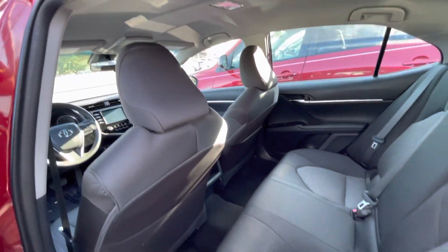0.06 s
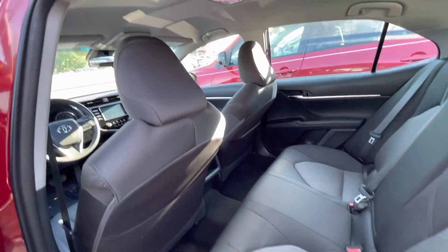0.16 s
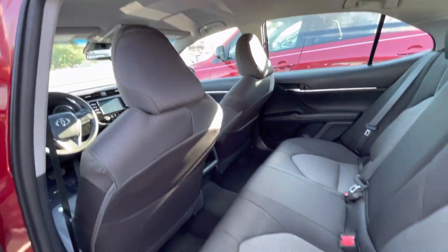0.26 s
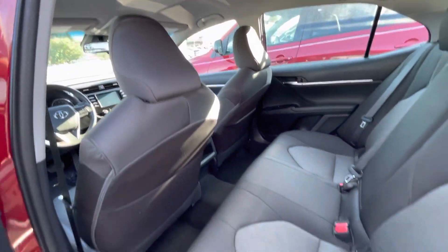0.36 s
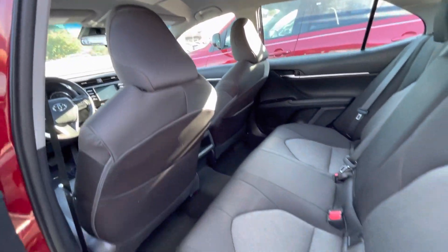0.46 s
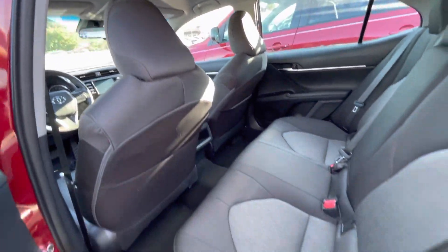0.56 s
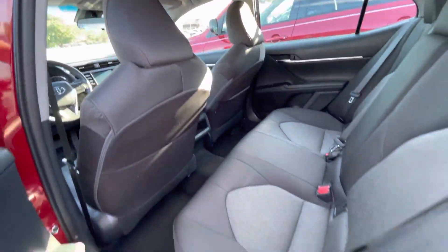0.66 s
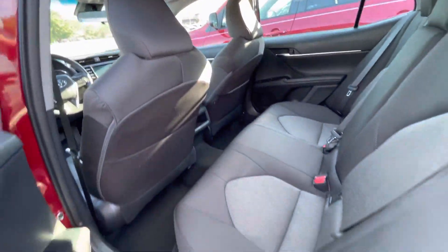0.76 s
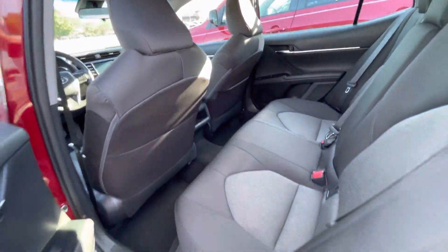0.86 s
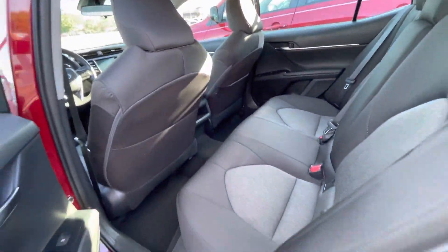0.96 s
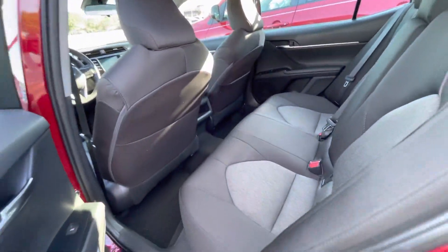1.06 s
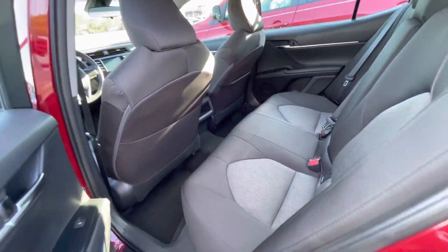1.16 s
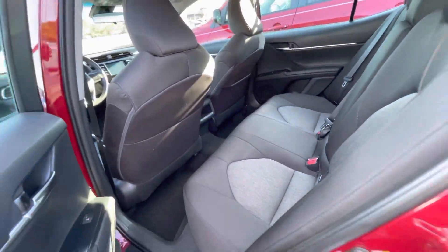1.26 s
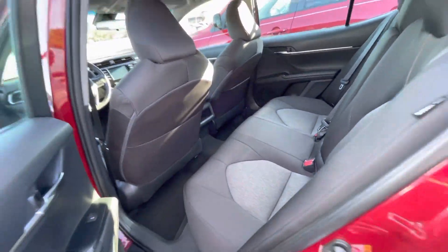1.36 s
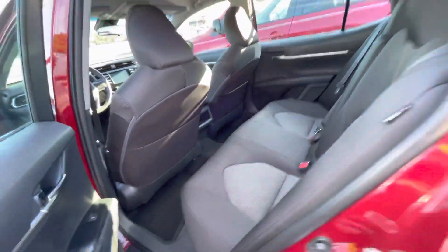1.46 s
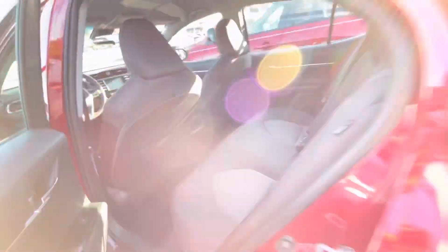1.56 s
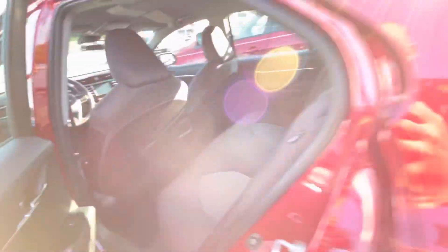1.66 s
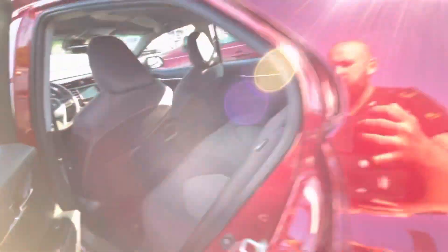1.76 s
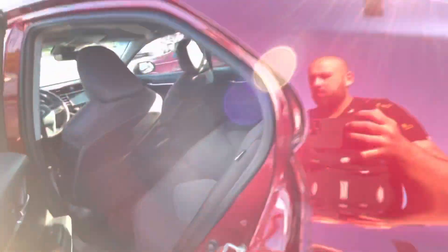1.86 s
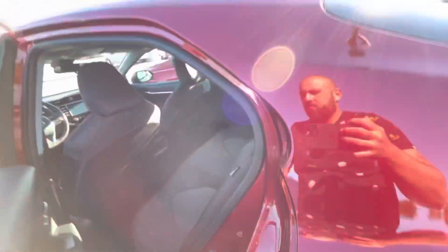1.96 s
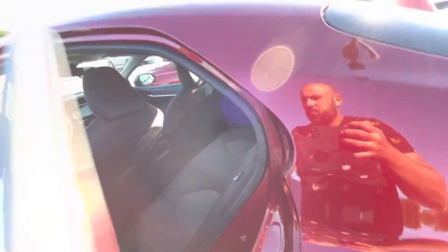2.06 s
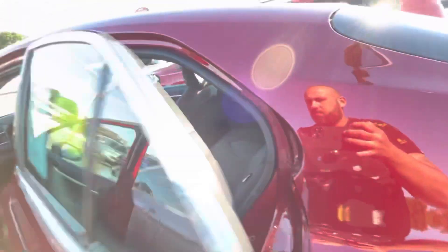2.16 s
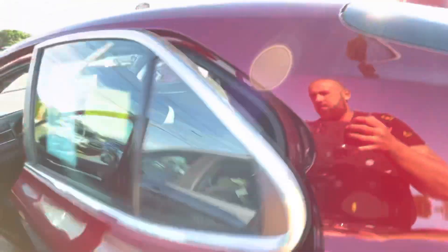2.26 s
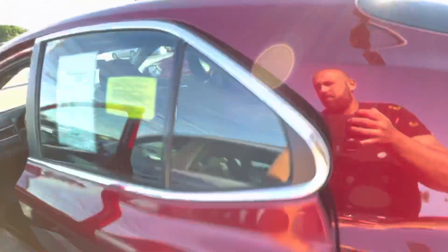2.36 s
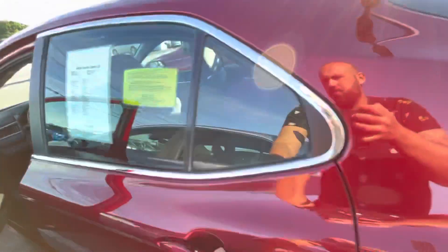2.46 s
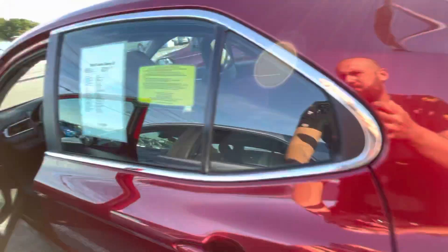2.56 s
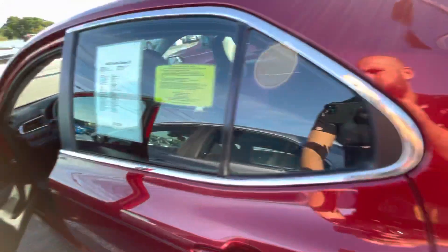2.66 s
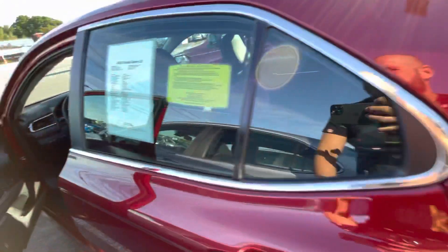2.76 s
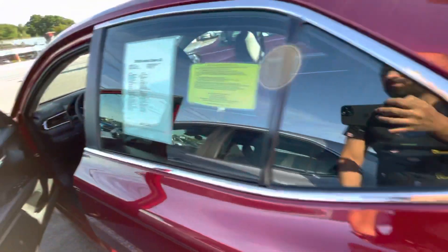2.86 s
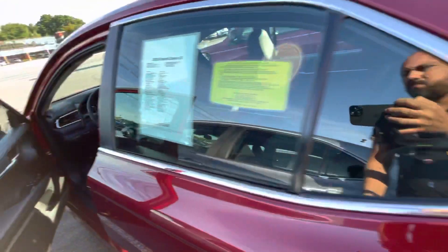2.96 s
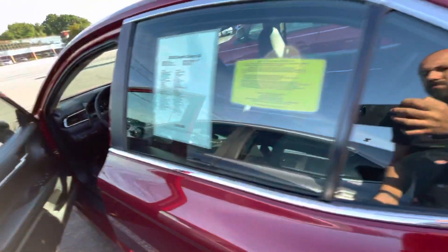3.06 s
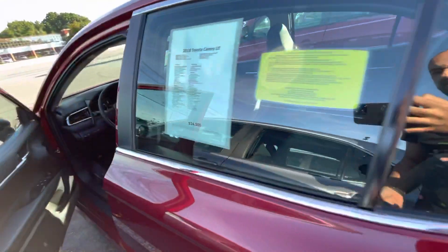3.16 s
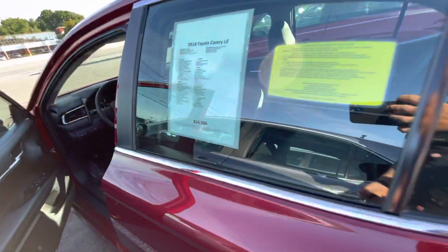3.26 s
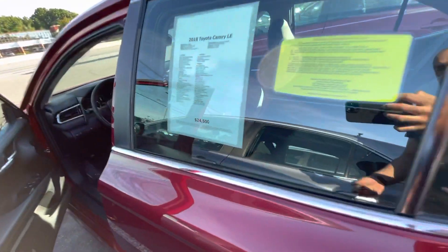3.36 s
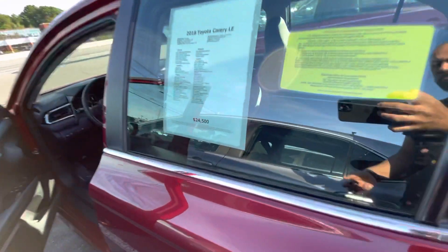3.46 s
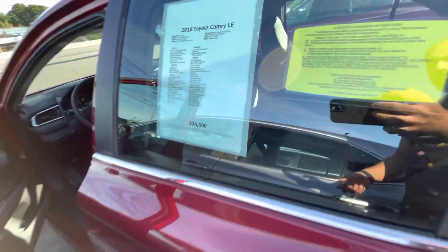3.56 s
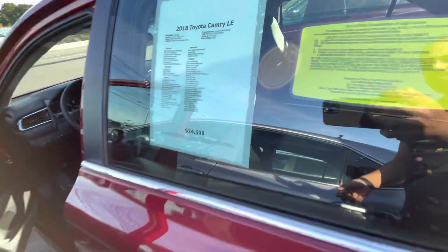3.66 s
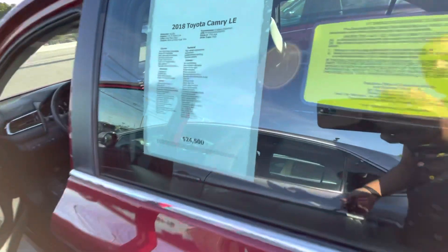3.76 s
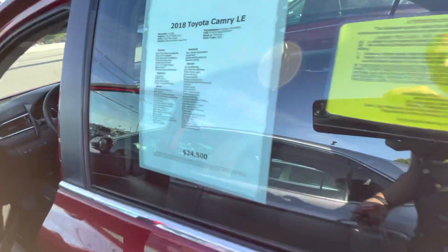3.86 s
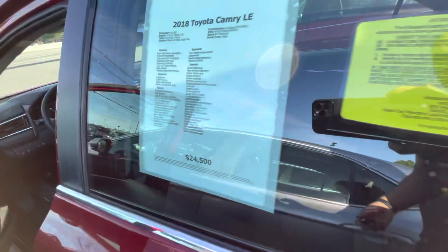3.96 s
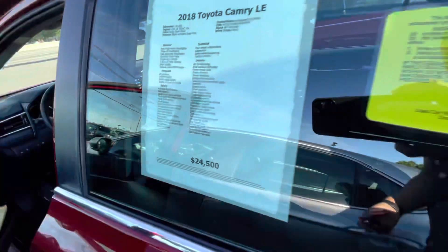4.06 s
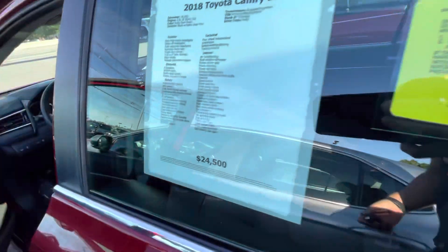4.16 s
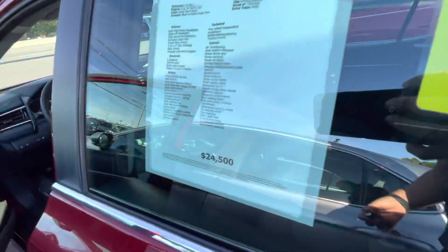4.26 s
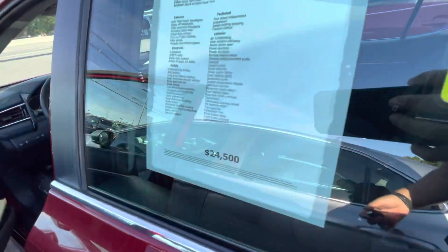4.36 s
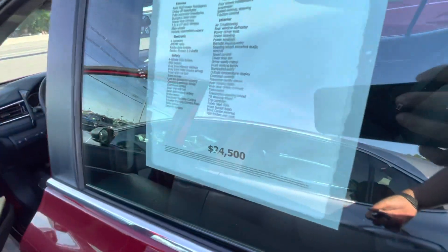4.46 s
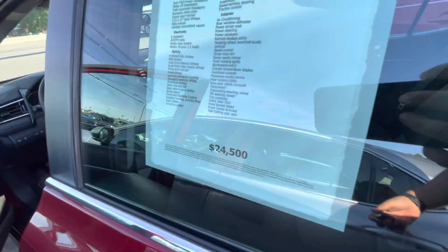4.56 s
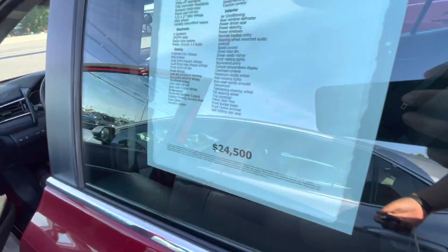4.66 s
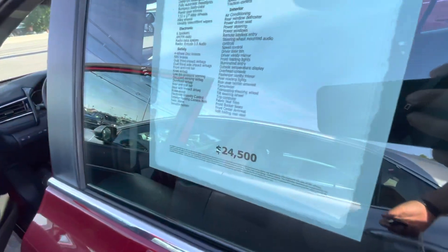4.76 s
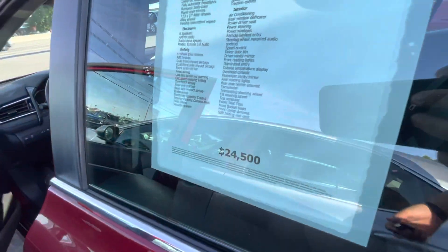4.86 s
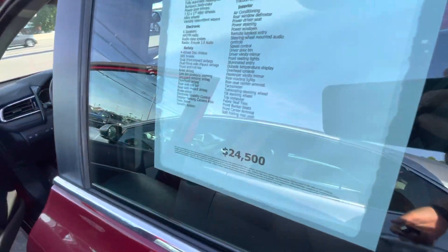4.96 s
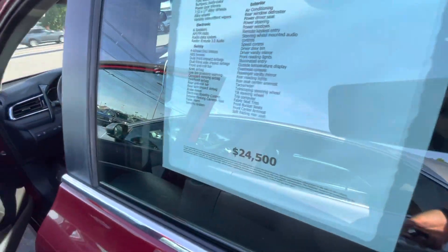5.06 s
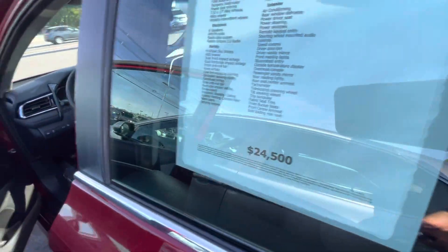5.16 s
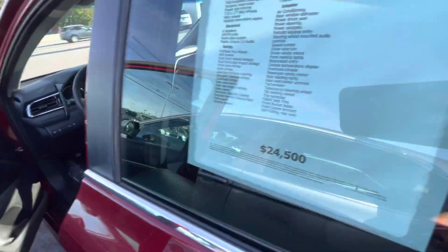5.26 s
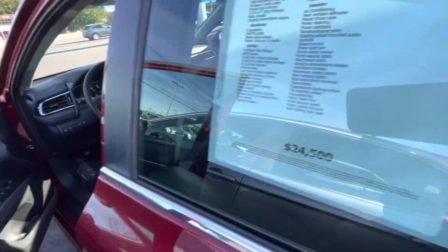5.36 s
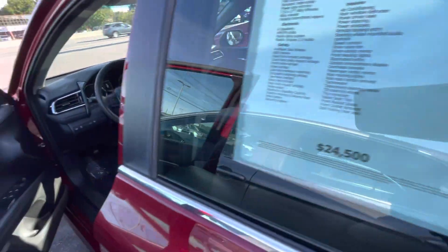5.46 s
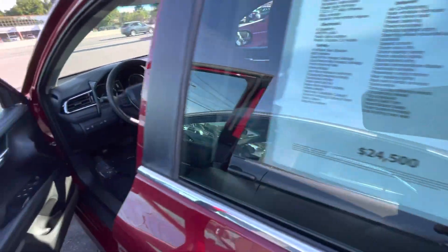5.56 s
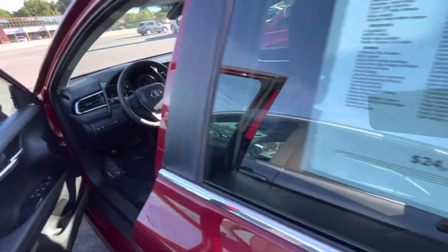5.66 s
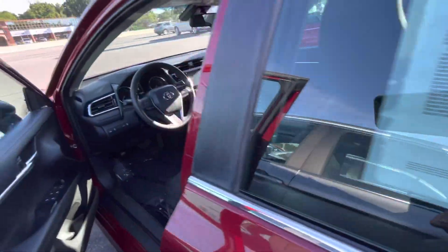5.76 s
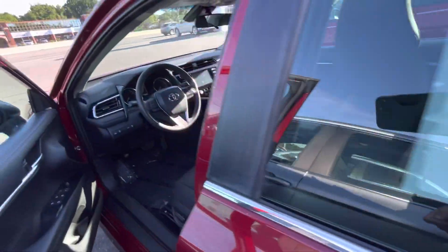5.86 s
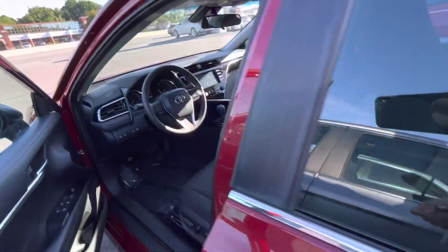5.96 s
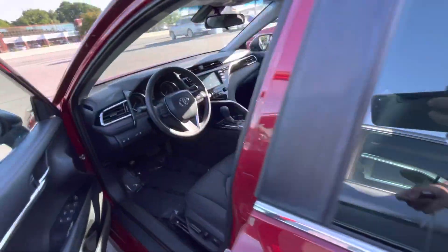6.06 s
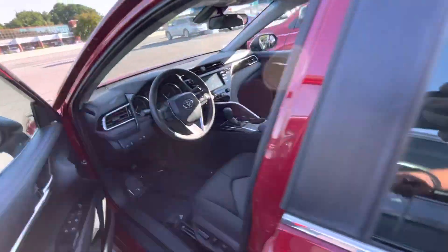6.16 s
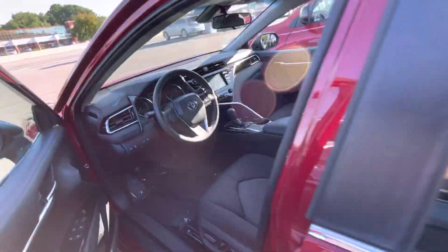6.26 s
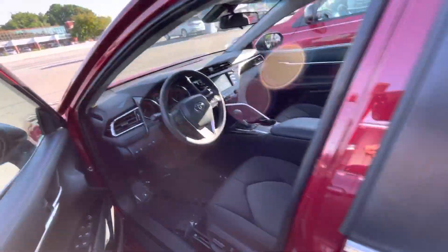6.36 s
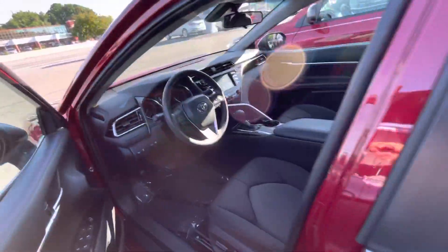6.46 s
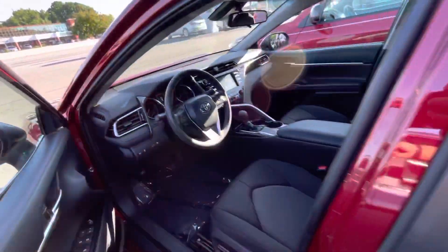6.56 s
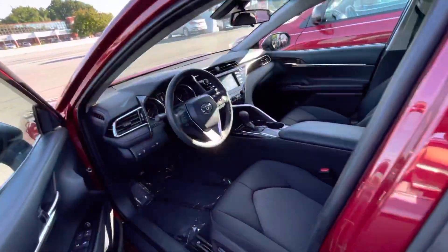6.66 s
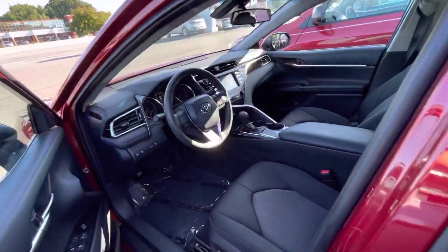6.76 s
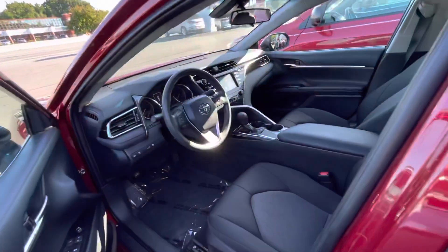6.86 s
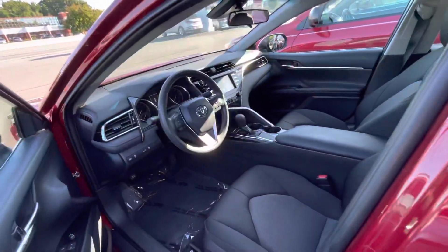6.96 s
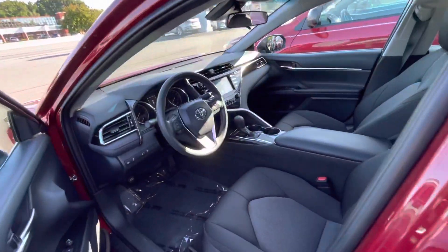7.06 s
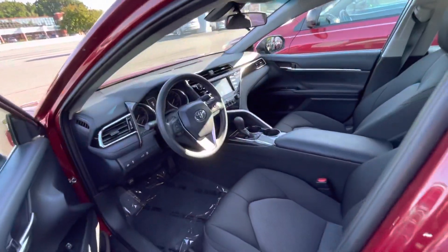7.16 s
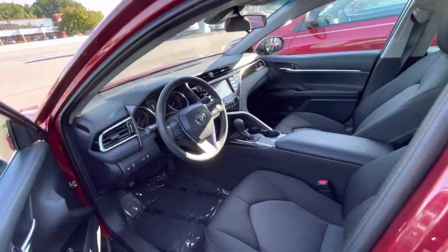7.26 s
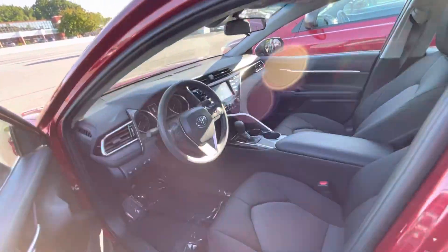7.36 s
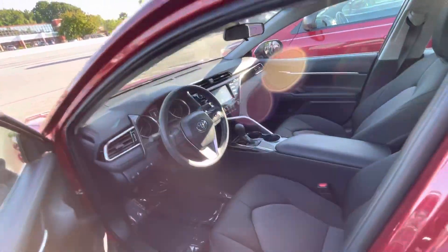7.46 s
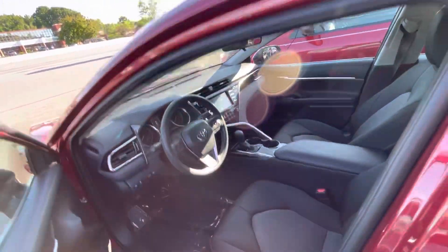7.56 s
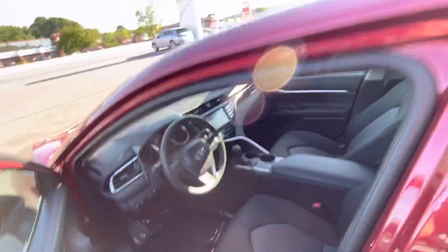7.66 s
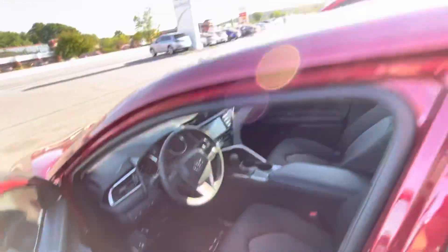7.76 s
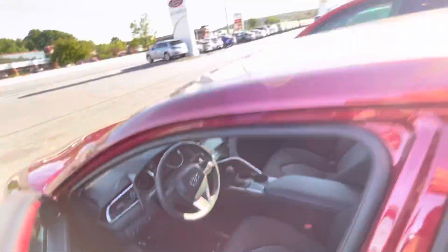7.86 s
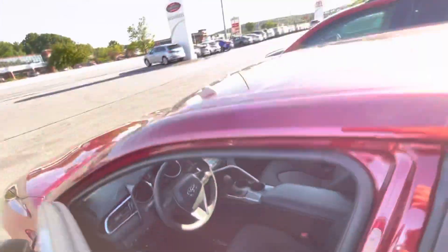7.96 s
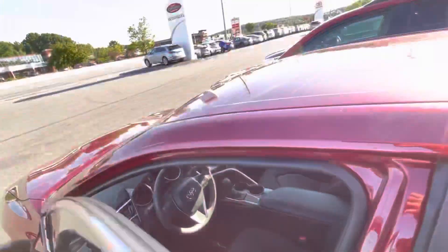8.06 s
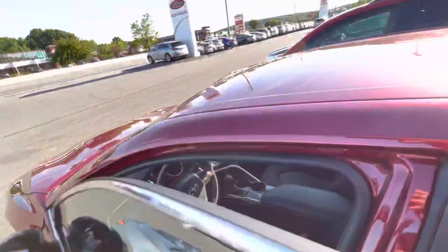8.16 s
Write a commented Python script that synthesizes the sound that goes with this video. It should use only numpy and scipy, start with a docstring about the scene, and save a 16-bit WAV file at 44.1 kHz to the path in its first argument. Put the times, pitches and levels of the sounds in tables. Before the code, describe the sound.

On an open lot with low traffic rumble, a car door slams with a heavy boom, then a dry clatter and a hard ringing clack follow.

```python
"""Car door closing on an open lot

A latch catches, a panel slams and a cabin booms: damped modes, filtered impact noise and low swells.
A dry clatter and later a ringing clack are runs of struck modes with grit; a limiter ducks loud peaks.
Scuffs, ticks, thuds and rustles are shaped noise; traffic and one passing car are coloured noise.
Small birds call faintly as gliding sines, with one buzzing trill of narrow-band noise."""
import sys
import numpy as np
from scipy import signal
from scipy.io import wavfile
from scipy.ndimage import uniform_filter1d, minimum_filter1d

SR = 44100
rng = np.random.default_rng(int(sys.argv[2]) if len(sys.argv) > 2 else 0)


def store_wav(level_fs):
    """Save 16-bit WAV to argv[1]."""
    pcm = np.round(np.clip(np.atleast_2d(level_fs), -1, 1) * 32767)
    wavfile.write(sys.argv[1], SR, pcm.T.astype(np.int16))


N = 362061
TIME = np.arange(N) / SR
RING_TIME = TIME[:SR // 2]


def amp(db):
    """Level law: decibels to amplitude gain."""
    return 10 ** (np.asarray(db) / 20)


def unit(x):
    """Normalization: scales a signal to rms 1."""
    return x / np.sqrt(np.mean(x ** 2) + 1e-20)


def read(points, hz):
    """Spectral envelope: joins (frequency, level) points on a log-frequency axis."""
    point_hz, level_db = np.transpose(points)
    return np.interp(np.log(hz + 1), np.log(point_hz + 1), level_db)


def over_time(points):
    """Linear interpolation of (time, value) points over the whole scene."""
    return np.interp(TIME, *np.transpose(points))


def panned(db):
    """Interaural level difference: left and right gains, positive to the left."""
    return amp(np.array([[db], [-db]]) / 2)


def add(mix, s, sound):
    """Superposition: mixes a stereo sound in at time s."""
    part = mix[:, round(s * SR):][:, :sound.shape[1]]
    part += sound[:, :part.shape[1]]


def dying(t60):
    """Exponential decay: falls 60 dB in t60 seconds."""
    return np.exp(-np.log(1000) * RING_TIME / t60)


def burst(t60, rise_s):
    """Impact envelope: a quick rise times an exponential decay."""
    return dying(t60) * (1 - np.exp(-RING_TIME / rise_s))


def grit(envelope, colour, tilt_db=0, same=.4, grain_db=-5.5):
    """Source-filter principle: tiny impacts of uneven size, coloured by the body they strike."""
    size = len(envelope)
    common, left, right = rng.standard_normal((3, size))
    same = np.clip(same, 0, 1)  # share of power common to both channels
    spray = np.sqrt(same) * common + np.sqrt(1 - same) * np.array([left, right])
    grain_size = amp(grain_db * np.minimum(rng.exponential(1, size), 4))
    spray = unit(spray * grain_size) * envelope

    hz = abs(np.fft.fftfreq(2048, 1 / SR))
    tilt = tilt_db * np.log2((hz + 100) / 2000)
    gain = unit(amp(read(colour, hz) + tilt))
    # minimum phase: the body rings only after each impact
    spectrum = np.exp(np.conj(signal.hilbert(np.log(gain))))
    body = np.fft.ifft(spectrum).real
    return signal.fftconvolve(spray, body[None, :1024], axes=1)[:, :size]


def ring(modes, lag_s, rise_s):
    """Modal superposition: decaying sines; the left port hears them lag_s after the right."""
    t = np.maximum(RING_TIME - np.array([[lag_s], [0]]), 0)
    total = 0
    for hz, db, t60, pan in modes:
        total = total + amp(db) * panned(pan) * dying(t60) * np.sin(2 * np.pi * hz * t)
    return (1 - np.exp(-t / rise_s)) * total


def wash(colour_db, same, lead_s, patchy_db, streaky_db=0):
    """Filtered noise, left port first; its level wavers in random short patches and longer narrow streaks."""
    frames, hz = N // 512 + 5, np.fft.rfftfreq(2048, 1 / SR)[:, None]
    a, b, c, d, patches, streaks = rng.standard_normal((frames, len(hz), 6)).T
    # axis 0 is frequency, axis 1 is time
    patches = uniform_filter1d(patches, size=14, axis=0)
    patches = unit(uniform_filter1d(patches, size=7, axis=1))
    streaks = uniform_filter1d(streaks, size=4, axis=0)
    streaks = unit(uniform_filter1d(streaks, size=45, axis=1))

    same = np.clip(same, -1, 1)  # correlation of the channels before the delay
    left = a + 1j * b
    right = same * left + np.sqrt(1 - same ** 2) * (c + 1j * d)
    right = right * np.exp(-2j * np.pi * hz * lead_s)
    frame_s = np.arange(frames) * 512 / SR
    level_db = colour_db(hz, frame_s) + patchy_db * patches + streaky_db * streaks
    spectra = np.array([left, right]) * amp(level_db)
    return unit(signal.istft(spectra, nperseg=2048, noverlap=1536)[1][:, :N])


def echoes(x, t60):
    """Diffuse reflection: scattered echoes from the parked cars around."""
    colour = [(100, 5.5), (800, -3.0), (3000, -10), (12000, -11.5)]  # frequency_hz, relative_level_db
    scatter = grit(burst(t60, rise_s=.01), colour, same=0.23)
    return signal.fftconvolve(x, scatter / np.linalg.norm(scatter[0]), axes=1)[:, :N]


# spectrum of the far road [frequency_hz, relative_level_db]
FAR_ROAR_COLOUR = [(150, -18), (300, -0.5), (500, -5.5), (700, -1.5), (950, 1), (1250, -4.5), (1800, -13),
                   (3000, -36.5), (6000, -71)]
# one hollow band that drifts in the far roar [time_s, centre_hz, lift_db]
HOLLOW_BAND = [(0, 865, 6), (.8, 820, 10.5), (1.3, 715, 12), (1.55, 840, 14), (1.85, 765, -3.5),
               (2.2, 780, 9), (2.9, 664, 8.5), (3.55, 664, 11.5), (3.9, 694, 6.5), (4.3, 904, 14),
               (4.8, 950, -2.5), (5.8, 940, 7.5), (6.5, 950, -1.5)]
HOLLOW_WIDTH_HZ = 100


def far_roar(hz, t):
    """Spectral envelope of the far road, with a Gaussian band that drifts."""
    s, centre_hz, lift_db = np.transpose(HOLLOW_BAND)
    offset = (hz - np.interp(t, s, centre_hz)) / HOLLOW_WIDTH_HZ
    return read(FAR_ROAR_COLOUR, hz) + np.interp(t, s, lift_db) * np.exp(-offset ** 2)


# level of the engine rumble all around [time_s, level_db]
ENGINE_LEVEL = [(0, -42), (.6, -40), (1.8, -42), (4.1, -41), (5.5, -42.5), (6.3, -47), (8.21, -45)]
# spectrum of the engine rumble [frequency_hz, relative_level_db]
RUMBLE_COLOUR = [(15, -31.5), (30, -26), (45, -7.5), (60, 5), (75, 0), (95, 1.5), (125, -4.5), (165, -10),
                 (215, -8.5), (290, -21.5), (400, -31), (800, -60.5)]
# spectrum of the far tyre hiss [frequency_hz, relative_level_db]
TYRE_COLOUR = [(600, -9), (1100, 1), (1600, 3), (2300, -5.5), (3200, -14), (4500, -19), (7000, -30),
               (12000, -68)]
FAR_ROAR_DB, FAR_HISS_DB = -50.5, -60


def traffic():
    """Incoherent summation: far engines rumble under a roar and tyre hiss."""
    rumble = wash(lambda hz, t: read(RUMBLE_COLOUR, hz),
                  same=0.99, lead_s=0.00061, patchy_db=1.28, streaky_db=0.77)
    roar = wash(far_roar, same=0.32, lead_s=0.00029, patchy_db=0.3, streaky_db=2.0)
    hiss = wash(lambda hz, t: read(TYRE_COLOUR, hz),
                same=0.69, lead_s=0.00028, patchy_db=2.0, streaky_db=3.5)
    road = amp(FAR_ROAR_DB) * roar + amp(FAR_HISS_DB) * hiss
    return amp(over_time(ENGINE_LEVEL)) * rumble + panned(2.1) * road


CLOSEST_S, SPEED_M_PER_S, DISTANCE_M = 4.965, 15, 10.3


def nearness(t):
    """Inverse-distance law: the car's closest distance over its distance at time t."""
    return DISTANCE_M / np.hypot(DISTANCE_M, SPEED_M_PER_S * (t - CLOSEST_S))


# one reflection cuts notches; its delay is longest when the car is closest
NOTCH_FAR_S, NOTCH_NEAR_S, NOTCH_DEPTH_DB = 0.00252, .00291, 2.5
NOTCH_BOTTOM_HZ, NOTCH_TOP_HZ = 750, 2300
# as the car leaves, a second reflection sets in and lags more and more, so its bands sink
SWEEP_START_S, SWEEP_ONSET_S, SWEEP_DELAY_S, SWEEP_S_PER_S = 4.67, .2, 0.0012, .00103
SWEEP_LIFT_DB, SWEEP_DEPTH_DB, SWEEP_TOP_HZ = 2, 5, 1050


def reflections(hz, t):
    """Comb filtering: two reflections off parked cars ripple the car's spectrum, in dB."""
    notch_s = NOTCH_FAR_S + (NOTCH_NEAR_S - NOTCH_FAR_S) * nearness(t) ** 2
    notches_db = -NOTCH_DEPTH_DB * np.cos(2 * np.pi * hz * notch_s)
    notches_db = notches_db * np.tanh((hz / NOTCH_BOTTOM_HZ) ** 2) ** 2
    notches_db = notches_db / (1 + (hz / NOTCH_TOP_HZ) ** 2)

    leaving_s = np.maximum(t - SWEEP_START_S, 0)
    delay_s = SWEEP_DELAY_S + SWEEP_S_PER_S * leaving_s
    sweep_db = SWEEP_LIFT_DB + SWEEP_DEPTH_DB * np.cos(2 * np.pi * hz * delay_s)
    sweep_db = sweep_db * np.tanh(leaving_s / SWEEP_ONSET_S) / (1 + (hz / SWEEP_TOP_HZ) ** 2)
    return sweep_db + notches_db


# parked cars screen the car except through one gap: change of the roar [time_s, gain_db]
SCREEN_GAIN = [(2.9, -4), (3.7, -1), (4.25, -3), (4.5, 1), (5.2, -0.5), (5.8, -1.5), (6.4, -8)]
HISS_SCREENING, FIZZ_SCREENING = 1.3, 1.8  # higher bands change this many times as much in dB
# spectra of the car's three bands of noise [frequency_hz, relative_level_db]
CAR_ROAR_COLOUR = [(150, -17), (300, -9), (450, -2), (650, 1), (950, 1), (1250, -7), (1800, -12.5),
                   (3000, -35), (6000, -62.5)]
CAR_HISS_COLOUR = [(600, -14), (1100, -2.5), (1600, 3.5), (2300, -4.5), (3200, -11), (4500, -21),
                   (7000, -32.5), (12000, -57.5)]
CAR_FIZZ_COLOUR = [(1500, -20), (3500, 5), (5200, 1), (6500, 1), (8500, -5), (10500, -19.5), (12500, -25),
                   (13500, -40)]
# levels at the closest point, before screening
CAR_ROAR_DB, CAR_HISS_DB, CAR_FIZZ_DB = -39.5, -47.5, -62.5


def passing_car():
    """Distance law and screening: a car at steady speed, its treble opening in the gap."""
    screen_db = over_time(SCREEN_GAIN)
    roar = wash(lambda hz, t: read(CAR_ROAR_COLOUR, hz) + reflections(hz, t),
                same=0.64, lead_s=0.00039, patchy_db=1.55, streaky_db=3.33)
    hiss = wash(lambda hz, t: read(CAR_HISS_COLOUR, hz) + reflections(hz, t),
                same=0.33, lead_s=0.00037, patchy_db=1.1, streaky_db=3.2)
    fizz = wash(lambda hz, t: read(CAR_FIZZ_COLOUR, hz),
                same=0.23, lead_s=0.00012, patchy_db=4.8, streaky_db=-0.5)
    car = amp(CAR_ROAR_DB + screen_db) * roar
    car = car + amp(CAR_HISS_DB + HISS_SCREENING * screen_db) * hiss
    car = car + amp(CAR_FIZZ_DB + FIZZ_SCREENING * screen_db) * fizz
    return nearness(TIME) * panned(1.2) * car


# clothes rustle with each movement [start_s, length_s, level_db]
RUSTLE_EVENTS = [(1.0, 0.85, -81), (1.932, 0.63, -67), (2.5, 1.03, -74.5), (3.687, 0.2, -71),
                 (5.82, 0.37, -64), (6.374, 0.19, -67.5), (7.353, 0.2, -78.5), (7.862, 0.42, -74.5)]
# spectrum of the rustle [frequency_hz, relative_level_db]
RUSTLE_COLOUR = [(1500, -22), (3500, 6), (6000, -0.5), (9000, 3), (10500, -17), (12000, -19.5),
                 (13000, -35.5)]
RUSTLE_EDGE_S, AIR_DB = 0.03, -82


def clothes():
    """Friction noise under smooth gates: rustles swell, hold and fade over a faint hiss."""
    level = amp(AIR_DB)
    for s, length, db in RUSTLE_EVENTS:
        swell = np.tanh((TIME - s) / RUSTLE_EDGE_S)
        fade = np.tanh((TIME - s - length) / RUSTLE_EDGE_S)
        level = level + amp(db) * (swell - fade) / 2
    noise = wash(lambda hz, t: read(RUSTLE_COLOUR, hz),
                 same=0.22, lead_s=.0003, patchy_db=3.5, streaky_db=3.0)
    return level * panned(0.69) * noise


# shoe scuffs on gritty asphalt [peak_s, level_db, rise_s, fall_s, brightness_db_per_octave]
SCUFF_EVENTS = [(1.084, -47, 0.028, 0.05, 1.5), (1.12, -41, 0.0086, 0.017, 1.5),
                (1.167, -39, 0.003, 0.017, -1.5), (1.3, -39, .009, 0.038, -1),
                (1.331, -43.5, 0.011, 0.0064, -0.5), (5.903, -44, 0.0084, 0.035, 2),
                (6.011, -55, 0.011, 0.013, 2), (6.086, -46.5, 0.005, 0.016, 9.5),
                (6.145, -56.5, 0.033, 0.027, 14.5), (7.923, -46, 0.03, 0.058, 0.5),
                (8.034, -37.5, .0015, 0.0087, -1.5), (8.066, -35.5, 0.013, 0.032, -0.5),
                (8.096, -39, 0.012, 0.012, 1), (8.2, -48.5, 0.043, .03, -0.5)]
# small ticks of grit and trim [start_s, level_db, brightness_db_per_octave]
TICK_EVENTS = [(0.934, -49.5, -1.5), (1.0825, -48, 1), (2.9434, -36, -5.5), (2.952, -51, 9),
               (2.9855, -49, 4), (3.07, -49.5, 7), (3.0968, -47, 3.5), (3.786, -52, 2), (4.041, -44.5, 1.5),
               (5.129, -37, 1), (5.6926, -44, -0.5), (5.896, -45, 3), (5.937, -44, 1), (6.085, -42.5, 0),
               (7.4451, -54.5, -7.5)]
# spectrum of scuffs and ticks [frequency_hz, relative_level_db]
SCUFF_COLOUR = [(150, -15), (400, -9), (850, 6), (1350, 3), (1900, -4), (2600, -6.5), (4000, -14),
                (7000, -19), (11000, -26), (13000, -47)]


def shoes():
    """Stick-slip friction: soles drag over grit in clumps, and single grains tick."""
    out = np.zeros((2, N))
    for s, db, rise, fall, tilt_db in SCUFF_EVENTS:
        t = RING_TIME - 4 * rise  # zero at the peak
        clumps = unit(uniform_filter1d(rng.standard_normal(len(t)), size=130))
        grip = unit(amp(3 * np.tanh(clumps)))
        stroke = np.exp(np.minimum(t / rise, -t / fall))
        add(out, s + t[0], amp(db) * grit(grip * stroke, SCUFF_COLOUR, tilt_db, same=0.21, grain_db=6))
    for s, db, tilt_db in TICK_EVENTS:
        add(out, s, amp(db) * grit(dying(0.055), SCUFF_COLOUR, tilt_db, same=0.13))
    return out


# light knocks of the plastic trim as a door starts to move [start_s, level_db]
TRIM_BLOWS = [(1.118, -40), (1.165, -41), (1.293, -39.5), (1.319, -39), (8.034, -46.5), (8.055, -46),
              (8.098, -44)]
# modes of the trim [pitch_hz, relative_level_db, t60_s, left_over_right_db]
TRIM_RESONANCES = [(1096, -5, 0.035, 0), (1365, -0.5, 0.054, 2), (1590, -1.5, .05, 1),
                   (2130, -9.5, 0.035, 1), (2380, -9, 0.038, 0), (3280, -12.5, 0.029, 1)]


def trim():
    """Modal resonance: plastic trim gives short hollow knocks."""
    out = np.zeros((2, N))
    for s, db in TRIM_BLOWS:
        add(out, s, amp(db) * ring(TRIM_RESONANCES, lag_s=.00005, rise_s=.0006))
    return out


# the door squeezes the cabin air [start_s, pitch_hz, level_db, time_to_peak_s]
CABIN_THUMP = (2.4692, 57.5, -11, .033)
# the cabin then booms on [start_s, pitch_hz, level_db, t60_s, rise_s]
CABIN_BOOM = (2.5098, 61.3, -17.5, .75, .025)


def cabin_air():
    """Cavity resonance: a heavy swell of pressure, then the low ring of the closed cabin."""
    s, hz, db, peak_s = CABIN_THUMP
    t = np.maximum(TIME - s, 0)
    swell = (t / peak_s * np.exp(1 - t / peak_s)) ** 4
    thump = amp(db) * swell * np.sin(2 * np.pi * hz * t)

    s, hz, db, t60, rise = CABIN_BOOM
    t = np.maximum(TIME - s, 0)
    envelope = np.exp(-np.log(1000) * t / t60) * (1 - np.exp(-(t / rise) ** 2))
    return thump + amp(db) * envelope * np.sin(2 * np.pi * hz * t)


# blows of the closing door
# [start_s, panel_ring_db, extra_bass_db, latch_rattle_db, rattle_t60_s]
CLOSING_BLOWS = [(2.4288, 0.5, -8.5, -34, 0.047), (2.4332, -7, -29, -32, 0.11),
                 (2.4464, -12, -10, -17.5, 0.086), (2.4500, -10.5, -10, -17.5, 0.091),
                 (2.4548, -1, -16, -17.5, 0.11), (2.4600, -13.5, 13, -26, 0.11),
                 (2.484, -12, 5, -18, 0.086)]
# modes of the door [pitch_hz, relative_level_db, t60_s, left_over_right_db]
PANEL_MODES = [(113, -5, 0.062, 0.5), (186, 0.5, 0.036, -0.5), (235.5, -15, 0.25, -5.5),
               (350.4, -7, 0.15, 3.5), (437, -22, 0.32, 3), (596, -46, 0.028, 9), (729, 1.5, 0.037, -11),
               (777, -20, 0.16, -1), (882, -13.5, 0.063, -14), (962, -10, 0.033, -14.5),
               (1184, -18, 0.039, -6), (1427, -31, 0.091, -2)]
# spectrum of the latch rattle [frequency_hz, relative_level_db]
LATCH_COLOUR = [(150, -28), (500, -2), (1000, 8.5), (1500, -7), (2200, -5.5), (3500, -7), (5000, -14.5),
                (8000, -16), (10500, -24.5), (12500, -24), (15000, -53)]
# the door seats on its rubber seal, which stops the earlier rings and shortens the last
SEATED_S, SEAL_DAMPING_S, SEATED_T60_S = 2.477, 0.0067, .4


def door():
    """Modal excitation: latch and panel meet in several blows; the seal damps the modes."""
    out = np.zeros((2, N))
    for s, ring_db, bass_db, rattle_db, t60 in CLOSING_BLOWS:
        modes = []
        for hz, db, decay, pan in PANEL_MODES:
            # the extra bass acts mostly below 450 Hz
            modes.append((hz, db + bass_db / (1 + (hz / 450) ** 4), decay, pan))
        if s < SEATED_S:
            seal = np.exp(-np.maximum(s + RING_TIME - SEATED_S, 0) / SEAL_DAMPING_S)
        else:
            seal = dying(SEATED_T60_S)
        add(out, s, amp(ring_db) * seal * ring(modes, lag_s=.00006, rise_s=0.0014))
        rattle = grit(burst(t60, rise_s=0.00023), LATCH_COLOUR, same=0.15, grain_db=4.5)
        add(out, s, amp(rattle_db) * panned(-0.69) * rattle)
    return out + cabin_air()


# dull footfalls [start_s, level_db, centre_hz]
HEEL_FALLS = [(2.945, -29, 69.4), (7.445, -38.5, 296), (8.06, -38, 414)]
FOOTFALL_T60_S, FOOTFALL_SLOPE_DB = 0.15, -20  # the slope is per octave off the centre


def footfalls():
    """Impact noise through a band resonance: heels land with a short dull thud."""
    out = np.zeros((2, N))
    skirt_db = 2 * FOOTFALL_SLOPE_DB  # two octaves out
    for s, db, hz in HEEL_FALLS:
        colour = [(hz / 4, skirt_db), (hz, 0), (hz * 4, skirt_db), (SR / 2, -80)]
        add(out, s, amp(db) * grit(burst(FOOTFALL_T60_S, rise_s=0.0089), colour, same=1.0))
    return out


# bird calls; a bend under 1 glides at once, over 1 holds first
# [start_s, length_s, start_pitch_hz, end_pitch_hz, bend, level_db]
BIRD_CALLS = [(3.11, 0.091, 4300, 4220, 1, -70), (3.48, 0.14, 6100, 5900, 0.86, -70),
              (3.855, .082, 6050, 5950, 1, -69), (5.993, 0.026, 2700, 2960, 0.8, -55),
              (6.12, 0.038, 2840, 2850, 1, -60), (6.597, 0.02, 2820, 2920, 0.88, -66.5),
              (7.657, .14, 4520, 3930, 0.6, -58.5), (7.874, 0.072, 4230, 3880, 1.4, -55),
              (8.14, 0.15, 4580, 3830, 0.46, -54)]
# a far bird's buzz [time_s, level_db]
TRILL_LEVEL = [(6.62, -104.5), (6.83, -73), (7.05, -72), (7.3, -80), (7.6, -97)]


def birds():
    """Frequency modulation: thin wavering whistles, smeared by echoes, and one far buzzing trill."""
    out = np.zeros((2, N))
    for s, length, start_hz, end_hz, bend, db in BIRD_CALLS:
        u = np.linspace(0, 1, int(length * SR))
        waver = unit(uniform_filter1d(rng.standard_normal(SR // 2), size=300))[:len(u)]
        hz = (start_hz + (end_hz - start_hz) * u ** bend) * (1 + 0.0033 * waver)
        whistle = np.sin(np.pi * u) * np.sin(2 * np.pi * np.cumsum(hz) / SR)
        add(out, s, amp(db) * panned(1) * whistle)
    # a flat-topped band around 4200 Hz
    buzz = wash(lambda hz, t: -np.minimum(((hz - 4200) / 300) ** 4, 60),
                same=.6, lead_s=0, patchy_db=1.5)
    return out + amp(-4) * echoes(out, t60=.4) + amp(over_time(TRILL_LEVEL)) * buzz


# knocks of the dry clatter [start_s, ring_level_db, pitch_hz, grit_level_db]
CLATTER_BLOWS = [(3.601, -42, 1890, -28), (3.6064, -16.5, 2070, -20), (3.6121, -10.5, 1900, -24),
                 (3.62, -11, 1580, -16), (3.625, -10, 1874, -18.5), (3.632, -25, 2170, -23),
                 (3.6382, -17, 1130, -19), (3.643, -14.5, 1010, -22.5), (3.648, -17, 557, -23),
                 (3.6511, -20, 308, -30), (3.6558, -16, 1300, -48)]
# spectrum of the clatter's grit [frequency_hz, relative_level_db]
CLATTER_COLOUR = [(120, -36), (300, -6), (550, 3), (1000, 3.5), (1600, 4), (2200, 2.5), (3000, -5),
                  (4200, -14.5), (6000, -12), (8500, -21), (11500, -22.5), (13000, -27)]


def clatter():
    """Repeated impact: a quick run of dry, heavily damped knocks whose pitch tends to sink."""
    out = np.zeros((2, N))
    for s, db, hz, grit_db in CLATTER_BLOWS:
        add(out, s, ring([(hz, db, .026, 1)], lag_s=.0001, rise_s=0.00047))
        noise = grit(burst(0.085, rise_s=0.0014), CLATTER_COLOUR, same=0.36, grain_db=3.0)
        add(out, s, amp(grit_db) * panned(0.91) * noise)
    return out


# bounces of the ringing clack [start_s, ring_level_db, grit_level_db]
BOUNCES = [(6.2746, -17.5, -19), (6.2795, -5.5, -28), (6.285, -3, -10.5), (6.2895, 11.5, -7),
           (6.2987, 9, -15), (6.315, 1, -10.5), (6.3264, 2.5, -15), (6.3370, -10.5, -16)]
# modes of the clacking part [pitch_hz, relative_level_db, t60_s, left_over_right_db]
PART_MODES = [(960, -17.5, 0.022, -8.5), (1020, -19, 0.079, 18), (1550, -14.5, .06, -9),
              (1675, 2.5, 0.08, -3.5), (1768, -8, 0.082, 4), (2080, -17.5, 0.11, -2), (2475, -19, .07, 4),
              (3020, -17.5, 0.14, 1), (3460, -19, 0.11, 9), (4700, -40, 0.1, 4.5), (5270, -28, .09, 3.5),
              (6110, -30, .09, 0.5)]
# spectrum of the clack's grit [frequency_hz, relative_level_db]
CLACK_COLOUR = [(120, -46.5), (330, -6), (650, -22), (900, 6.5), (1300, -4.5), (1800, -1), (2400, -6),
                (3400, -9), (4300, -15), (6500, -20), (9000, -21.5), (11500, -26), (13000, -40.5),
                (15500, -50.5)]


def clack():
    """Contact damping: a hard part bounces to rest; each new contact stops the ring before it."""
    out = np.zeros((2, N))
    starts = [row[0] for row in BOUNCES]
    free_s = np.diff(starts, append=starts[-1] + 0.008)
    for (s, ring_db, grit_db), free in zip(BOUNCES, free_s):
        # damping sets in 1 ms before the next contact
        damping = np.exp(-np.maximum(RING_TIME - free + .001, 0) / 0.0008)
        add(out, s, amp(ring_db) * damping * ring(PART_MODES, lag_s=0.00013, rise_s=0.0017))
        noise = grit(burst(0.081, rise_s=0.00054), CLACK_COLOUR, same=0.32, grain_db=0.5)
        add(out, s, amp(grit_db) * panned(1.8) * noise)
    return out


def scene():
    """Superposition: near sounds with their faint echoes, over the open lot."""
    near = shoes() + trim() + door() + footfalls() + clatter() + clack()
    lot = traffic() + passing_car() + clothes() + birds()
    return near + amp(-28.5) * echoes(near, t60=0.14) + lot


CEILING_DB, RECOVERY_DB_PER_S, EDGE_HZ = -0.26, 44.5, 12450


def record(dry):
    """Peak limiting: ducks at once on the loudest peaks, recovers slowly; then a steep low-pass."""
    over_db = np.maximum(20 * np.log10(abs(dry).max(0) + 1e-9) - CEILING_DB, 0)
    recovery_db = RECOVERY_DB_PER_S * TIME
    gain_db = recovery_db - np.maximum.accumulate(over_db + recovery_db)
    # the centred windows spread each dip a few samples ahead and round its edges
    smooth_db = uniform_filter1d(minimum_filter1d(gain_db, size=41), size=41)
    limited = dry * amp(smooth_db)
    low_pass = signal.firwin(161, EDGE_HZ, window=("kaiser", 6), fs=SR)
    return signal.oaconvolve(limited, low_pass[None], "same")


dry = scene()
out = record(dry)
store_wav(out)
```